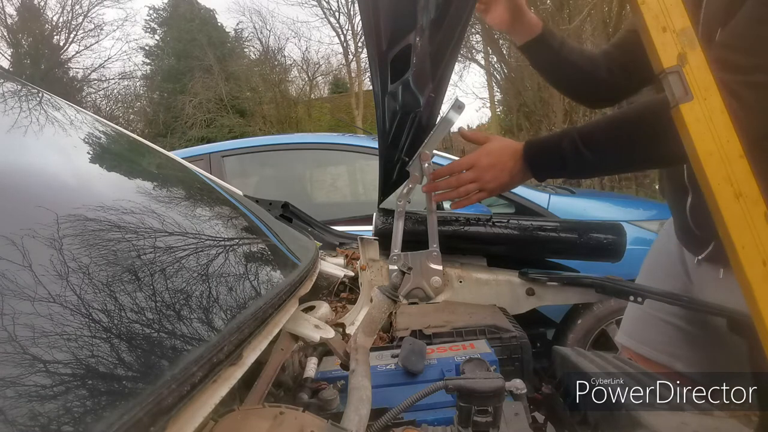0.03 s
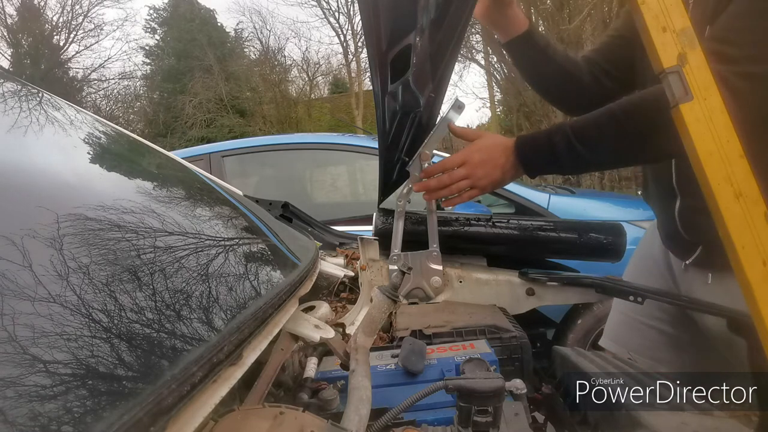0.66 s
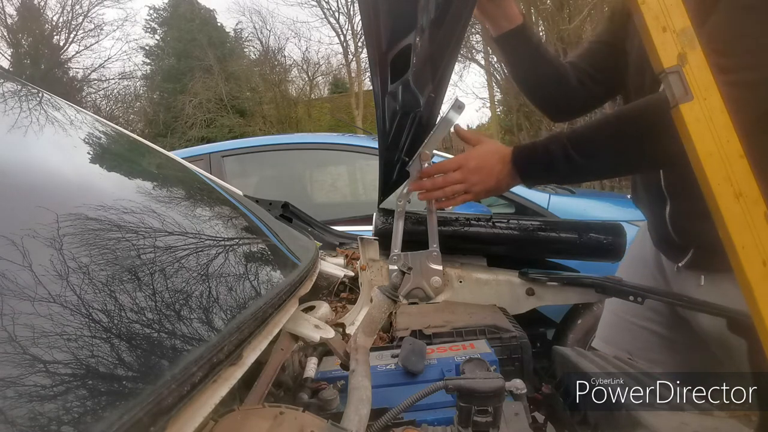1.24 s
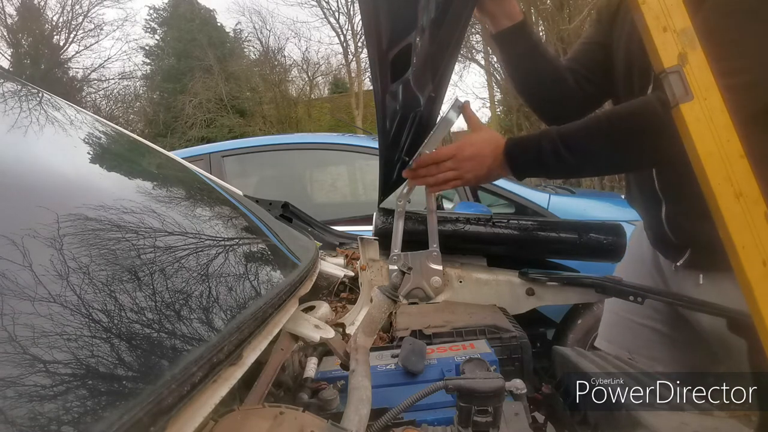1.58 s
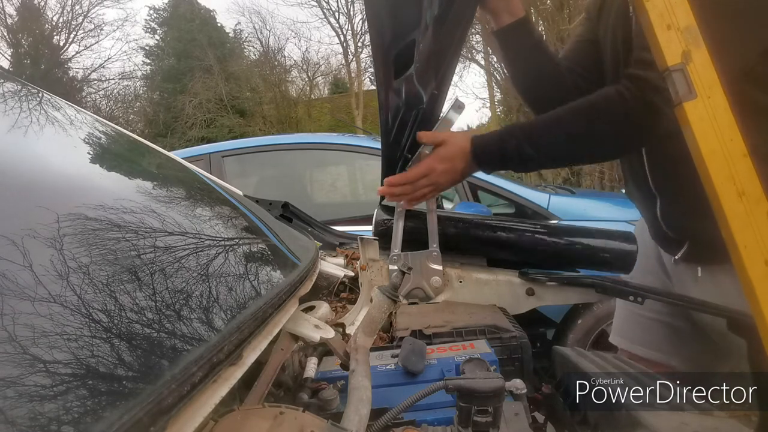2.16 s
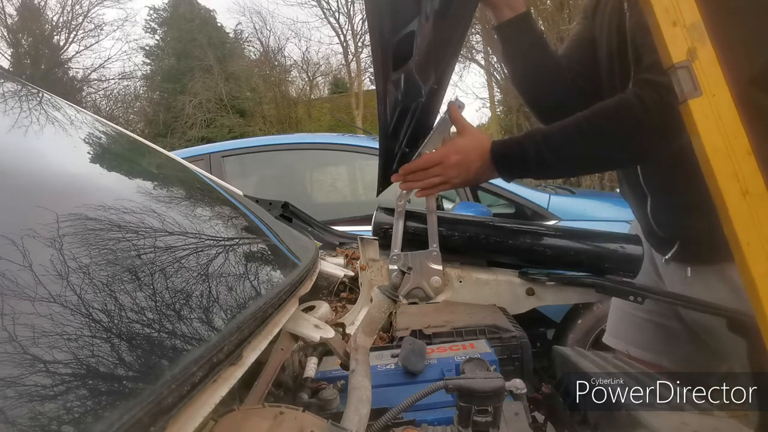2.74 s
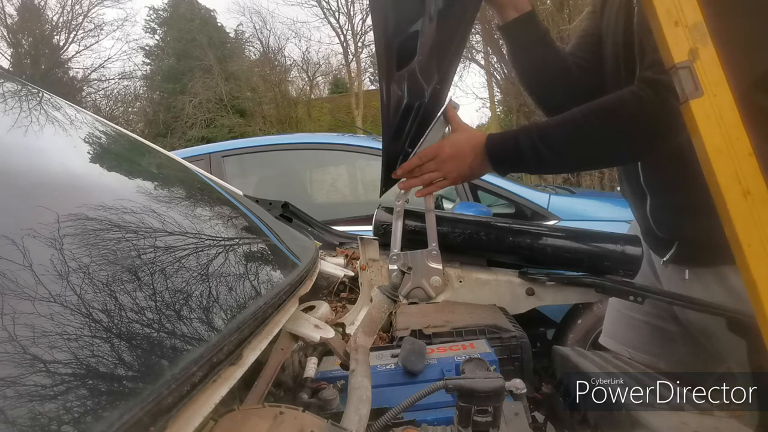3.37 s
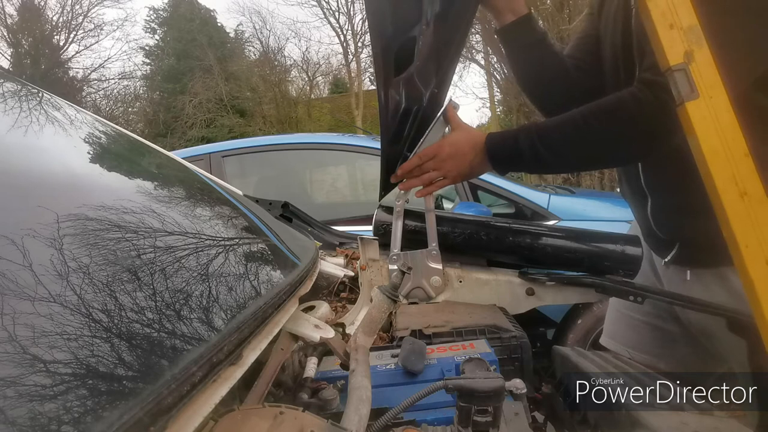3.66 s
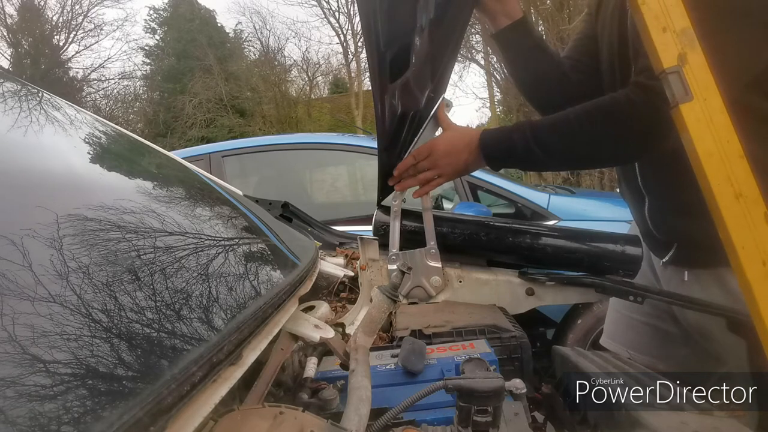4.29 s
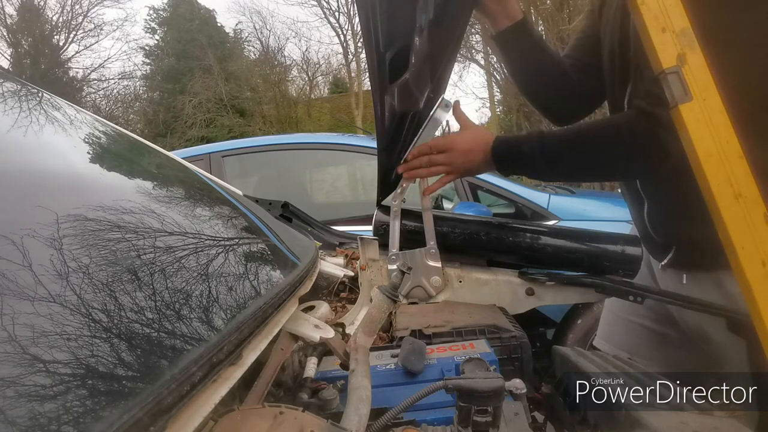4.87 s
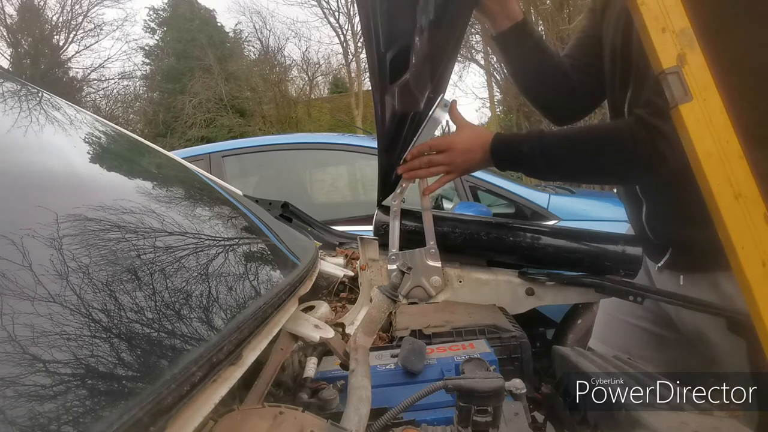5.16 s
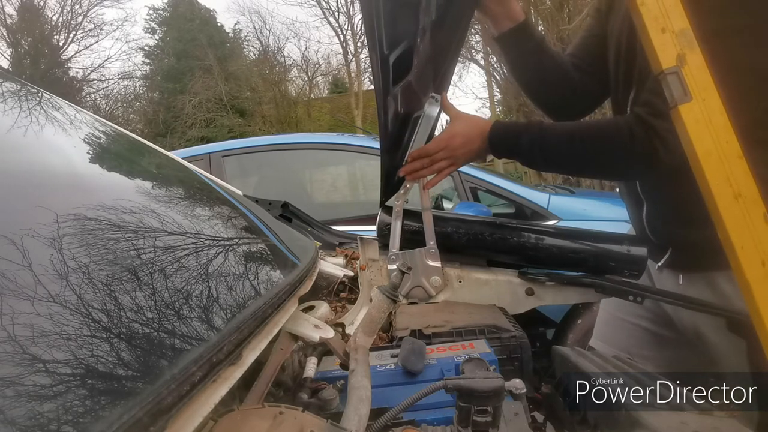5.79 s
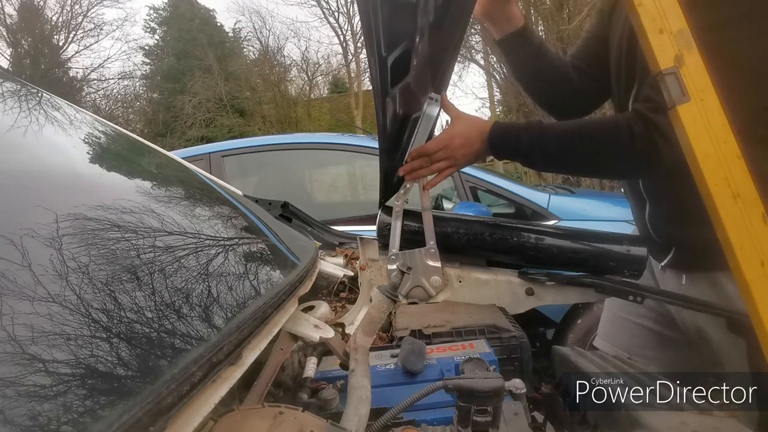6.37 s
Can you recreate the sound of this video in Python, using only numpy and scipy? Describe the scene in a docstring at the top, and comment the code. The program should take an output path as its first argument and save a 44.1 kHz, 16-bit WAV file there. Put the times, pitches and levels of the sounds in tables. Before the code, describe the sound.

Outdoors, a car bonnet is jiggled onto its hinge with close metal clunks, dull panel booms and small bolt scrapes over faint distant traffic.

```python
"""A car draws away, leaving the low wash of a far road, and a sleeve brushes painted steel.
Then, outdoors and close by, a car bonnet is jiggled onto its hinge: the hinge arm clunks and rattles
against its bracket, the big panel bends with dull booms, and a bolt ticks and scrapes in its hole.
Walls and parked cars send back a faint echo of the blows."""
import sys
import numpy as np
from scipy import signal
from scipy.fft import rfft, irfft, next_fast_len
from scipy.io import wavfile
from scipy.ndimage import map_coordinates

SR = 44100
rng = np.random.default_rng(int(sys.argv[2]) if len(sys.argv) > 2 else 0)


def log_audio(samples):
    """Write samples as a 16-bit WAV file to the path given in sys.argv[1]."""
    # one column per channel
    frames = np.atleast_2d(samples).T
    # limit to full scale, then quantise
    limited = np.clip(frames, -1, 1)
    pcm = np.round(limited * 32767).astype(np.int16)
    wavfile.write(sys.argv[1], SR, pcm)


N = 288193
CLOCK = np.arange(N) / SR  # seconds through the scene
T = np.arange(SR // 2) / SR  # seconds through one blow

# Tone colours, saying how strong each pitch is next to the others: pitch_hz, level_db
CAR_TYRES = [(60, 5), (170, -9.5), (280, 0), (520, -9.5), (880, -2.5), (1030, 6.5), (1200, -2.5),
             (2100, -10), (2800, -11.5), (4300, -24), (6000, -23.5), (7300, -35.5), (9000, -55),
             (16000, -66)]  # the nearer car
ROAD_TYRES = [(88, -42.5), (150, -1), (172, -8.5), (213, -1), (328, -6), (422, -3.5), (566, -9),
              (1020, -0.5), (1290, -2.5), (1790, -7.5), (3700, -25.5), (6640, -33), (8400, -49),
              (14500, -57.5), (16000, -70.5)]  # the far road
ROAD_RUMBLE = [(15, -8), (30, -14), (52, 4), (75, -4.5), (110, -1.5), (170, -15.5), (300, -16.5),
               (700, -60.5)]  # the bass under the traffic
CLOTH_HISS = [(1500, -25), (4000, 9), (6500, 9.5), (9000, -5), (13000, -16), (16000, -25)]  # cloth on paint
WEAK_TONES = [(40, -4), (130, -1.5), (700, -5), (1800, -9.5), (2600, -14), (3600, -13.5), (5000, -17),
              (6300, -18), (7500, -24), (9000, -40.5), (13000, -37.5), (16000, -41)]  # the panel's crowd of weaker tones
THREAD_FRICTION = [(1000, -16), (2600, 3.5), (5200, -6.5), (7200, 6), (9000, -25), (16000, 15)]  # the bolt's thread rubbing
MIC_COLOUR = [(7400, -0.5), (8600, -3), (9500, -5), (11500, -2.5), (15000, -9)]  # the microphone's openings
# Stereo width, or how much the two ears differ: pitch_hz, side_db
TRAFFIC_WIDTH = [(60, -25.5), (110, -20.5), (200, -20.5), (380, -18.5), (700, -14.5), (1290, -13),
                 (2380, -6.5), (4400, -2), (8120, 2.5), (15000, -2)]
CLOSE_WIDTH = [(100, -25), (250, -33), (500, -13), (1000, -13.5), (2000, -7), (5000, 4.5), (12000, -3.5)]
# Rubbing strokes: peak_s, level_db, swell_s
SLEEVE_STROKES = [(1.0, -62, 0.029), (1.42, -68, 0.023), (6.08, -68, .015), (6.39, -68, .025)]
BOLT_SCRAPES = [(2.865, -57.5, 0.04), (3.49, -72, 0.013), (3.555, -54, 0.046), (3.885, -61.5, 0.019),
                (4.8, -62, 0.023)]
# The hinge arm hits its bracket. A higher contact_hz is a harder hit; the struck spot favours spot_hz.
# start_s, level_db, contact_hz, spot_hz, into_panel_db
HINGE_CLANKS = [(2.273, -28, 5100, 2310, 7.5), (2.322, -28, 4070, 238, -1), (2.337, -31.5, 8800, 5870, 1),
                (2.355, -40.5, 3200, 940, -14), (2.365, -38.5, 5030, 1790, 5),
                (2.3993, -45.5, 7060, 4570, -5), (2.467, -44, 6000, 2340, -2),
                (2.827, -49.5, 6040, 2500, -8.5), (3.535, -47, 1700, 796, 13),
                (4.205, -32.5, 1460, 1252, -2.5), (5.217, -52.5, 3180, 2780, 5.5),
                (5.5377, -41, 5900, 286, 3), (5.8778, -24.5, 2950, 467, -9)]
# The bonnet is shoved against its stop:
# start_s, level_db, contact_hz, spot_hz, boom_db, sway_back_s, boom_hz
BONNET_SHOVES = [(2.297, -48, 690, 210, -32, .13, 125), (2.831, -61, 1180, 460, -50, .04, 136),
                 (3.471, -42, 1500, 767, -35, 0.051, 142.4), (3.926, -33.5, 1400, 764, -29.5, .15, 116.5),
                 (4.507, -48, 850, 220, -39.5, 0.061, 119), (4.916, -53, 980, 723, -41, 0.087, 122),
                 (5.214, -76, 800, 490, -50, 0.021, 185), (5.4733, -34, 1400, 281, -36, 0.16, 198)]
# The three contacts within one blow: delay_s, change_db, duller_octaves, body_db
CLANK_BOUNCES = [(0, 1, 0.053, -7.5), (.01, -6.5, 0.26, -7), (.05, -12.5, 1.3, -0.5)]  # strikes, rebounds and seats
SHOVE_SETTLES = [(0, 0.5, 0.27, -3), (.018, -9, 0.89, 5), (.052, -13, 1.2, 10.5)]  # lands, then settles twice as the weight follows
# The main tones of bonnet and hinge (each blow shortens their ring): pitch_hz, level_db, base_ring_s
STEEL_TONES = [(85, -15, 1), (127.5, 5.5, 0.28), (142.8, 11.5, 0.34), (182.4, 0, 0.72), (195, 4.5, 0.43),
               (232.4, -7, 1), (266.6, -7.5, 0.47), (327.4, -7.5, 0.69), (396.1, 0, 0.2), (473.2, 2, 0.12),
               (556, -1, 0.11), (615, -15, 0.075), (625.3, 5.5, 0.21), (677.3, 5, 0.22), (755.4, 4, 0.14),
               (873, -10.5, 0.3), (993, -6, 0.037), (1104, 3.5, 0.088), (1090, -33, 0.093),
               (1327, -19, 0.03), (1328, -3.5, 0.27), (1567, 6.5, 0.13), (1750, 7.5, 0.04),
               (2042, -4.5, 0.042), (2403, -12, 0.054), (2770, -0.5, 0.11), (2960, -4.5, 0.2),
               (4200, -21.5, 0.055), (5140, -8, 0.087), (5440, 7.5, 0.039)]
# How long the weaker tones last, before that shortening: pitch_hz, base_ring_s
WEAK_TONE_RING = [(100, 0.39), (400, 0.36), (800, 0.22), (1600, 0.19), (3000, 0.19), (6000, 0.13),
                  (12000, 0.12)]
# Where the metal touches, told by how much sooner the left side hears it: time_s, left_lead_us
CONTACT_SIDE = [(3, -26), (3.4, 40)]
# The bolt knocks in its hole: start_s, level_db, highest_hz
BOLT_TICKS = [(2.337, -25, 9600), (2.813, -55, 9000), (2.8266, -37, 18000), (3.9285, -58, 14000),
              (4.206, -59.5, 9100), (4.478, -52.5, 6900), (5.1415, -46.5, 12900), (5.3737, -46, 12900),
              (5.88, -40, 6480)]
# Pitches at which small parts ring: pitch_hz, width_hz, level_db
BOLT_TONES = [(2550, 62, -1), (2700, 14, 11), (3280, 50, -11), (3500, 160, -3.5), (3670, 120, -32.5),
              (5584, 49, -0.5), (5350, 260, -3.5), (6040, 310, -14), (6600, 44, 4), (6370, 81, -21),
              (6760, 66, -13), (9400, 460, -20), (11900, 210, -13), (12900, 1200, -11), (14700, 900, -14.5)]  # bolt and hinge eye
SQUEAK_TONES = [(2600, 130, -8.5), (3140, 240, -16.5), (3800, 65, -34), (5120, 28, -1), (5860, 270, -12.5),
                (5990, 64, -15), (7060, 57, -19.5)]  # the dragging thread
# How long the echo takes to fall by 60 dB: pitch_hz, ring_s
ECHO_RING = [(100, 0.66), (500, 0.36), (2000, 0.11), (8000, 0.029)]
# How the microphone's two sides differ: pitch_hz, left_minus_right_db
MIC_BALANCE = [(60, -1.5), (110, 0.5), (200, -1.5), (380, -1.5), (700, -1), (1290, -1), (2380, 0.5),
               (4400, -4.5), (8120, -4.5), (15000, 2.5)]


def amp(db):
    """Turn decibels into a number to multiply by."""
    return 10 ** (np.asarray(db) / 20)


def unit(x):
    """Scale a sound to an average (rms) level of 1."""
    return x / np.sqrt(np.mean(x ** 2) + 1e-20)


def along(points, hz):
    """Read between the rows of a (pitch_hz, value) table, on a musical scale."""
    pitches, values = np.transpose(points)
    return np.interp(np.log(hz + 1), np.log(pitches + 1), values)


def fade(t, ring_s):
    """A fade that falls by 60 dB in ring_s."""
    return np.exp(-np.log(1000) * t / ring_s)


def wobble(rate):
    """A smooth curve through `rate` random values a second."""
    return map_coordinates(rng.standard_normal(int(N * rate / SR) + 4), [CLOCK * rate])


def filtered(x, response):
    """Multiply each pitch in a sound by response(hz)."""
    size = next_fast_len(x.shape[-1] + SR // 4)
    hz = np.fft.rfftfreq(size, 1 / SR)
    return irfft(rfft(x, size) * response(hz), size)[..., :x.shape[-1]]


def lowpass(x, hz):
    """Take away the treble, as a soft contact does."""
    return signal.sosfilt(signal.butter(4, min(hz, .45 * SR), fs=SR, output="sos"), x)


def band(x, low_hz, high_hz, order=3):
    """Keep one range of pitches, scaled to level 1 over its first moments."""
    kept = signal.sosfilt(signal.butter(order, [low_hz, high_hz], "bandpass", fs=SR, output="sos"), x)
    return kept / kept[:, :int(SR * (.008 + 4 / low_hz))].std()


def noise(colour, width, size):
    """Stereo noise with a given tone colour, at level 1."""
    mid, side = filtered(rng.standard_normal((2, size)), lambda hz: amp(along(colour, hz)))
    side = filtered(side, lambda hz: amp(along(width, hz)))
    return unit(np.array([mid + side, mid - side]))


def dying(x, ring_times, stretch=1):
    """Let each pitch die away at its own speed."""
    hz, t, slices = signal.stft(x, SR, nperseg=256)
    faded = slices * fade(t, stretch * along(ring_times, hz)[:, None])
    return signal.istft(faded, SR, nperseg=256)[1][:, :len(T)]


def add(track, start_s, sound):
    """Mix one blow into the track."""
    part = track[:, round(start_s * SR):][:, :len(T)]
    part += sound[:, :part.shape[1]]


def traffic(road_fall_db_per_s=0.8744, car_fall_db_per_s=22.5, car_stays_s=.17):
    """One car holds its level, then draws away; the far road's tyre roar and rumble slowly thin."""
    road_db = -47.5 - road_fall_db_per_s * CLOCK
    car_db = -39.5 - car_fall_db_per_s * np.maximum(CLOCK - car_stays_s, 0)
    flutter_db = .5 * wobble(4.1)
    rumble_db = -31 + 0.39 * road_db  # bass fades less with distance
    roar = amp(road_db + flutter_db) * noise(ROAD_TYRES, TRAFFIC_WIDTH, N)
    car = amp(car_db) * noise(CAR_TYRES, TRAFFIC_WIDTH, N)
    rumble = amp(rumble_db + flutter_db) * noise(ROAD_RUMBLE, TRAFFIC_WIDTH, N)
    return roar + car + rumble


def swells(strokes, ease_off=0.7):
    """The loudness of rubbing strokes: each swells to a peak and eases off a little faster."""
    gain = np.zeros(N)
    for peak_s, db, swell_s in strokes:
        width_s = np.where(CLOCK < peak_s, swell_s, ease_off * swell_s)
        gain += amp(db) * np.exp(-((CLOCK - peak_s) / width_s) ** 2 / 2)
    return gain


def sleeve(grain_db=3):
    """Cloth brushes the paint with a faint, grainy hiss."""
    hiss = noise(CLOTH_HISS, CLOSE_WIDTH, N) * amp(grain_db * wobble(250))
    return swells(SLEEVE_STROKES) * unit(hiss)


def ring(spot_hz, stretch, spot_db, spot_width, crowd_db):
    """Struck steel rings with its main tones and a crowd of weak ones, lifted near the spot's pitch."""
    def lift_db(hz):
        return spot_db * np.exp(-(np.log((hz + 1) / spot_hz) / spot_width) ** 2)

    hz, db, base_ring_s = np.transpose(STEEL_TONES)[:, :, None]
    strength = amp(db + lift_db(hz) + 2 * rng.standard_normal(hz.shape))
    phase = rng.uniform(0, 2 * np.pi, hz.shape)
    ear_phase = phase + amp(along(CLOSE_WIDTH, hz)) * rng.standard_normal((2, *hz.shape))
    waves = strength * fade(T, stretch * base_ring_s) * np.exp(2j * np.pi * hz * T)
    tones = (np.exp(1j * ear_phase[..., 0]) @ waves).imag  # add up the waves for each ear
    crowd = filtered(noise(WEAK_TONES, CLOSE_WIDTH, len(T)), lambda f: amp(lift_db(f)))
    crowd = dying(unit(crowd), WEAK_TONE_RING, stretch)
    return tones / tones[:, :SR // 50].std() + amp(crowd_db) * crowd


def strike(db, contact_hz, spot_hz, body_db, dull_db_per_octave):
    """One hit on the steel: the harder it is, the higher the pitches it wakes and the shorter they ring."""
    ranges_hz = [(240, 500), (500, 1000), (1000, 2500), (2500, 16000)]
    centres_hz = np.array([330, 700, 1500, 4500])
    hardness = contact_hz / 2000
    stretch = min(0.78 / hardness ** 0.36, 0.73)  # a hand holds the panel, so the ring stays short
    steel = ring(spot_hz, stretch, spot_db=11, spot_width=0.041, crowd_db=2.5)
    # Ranges above contact_hz are weaker; the range around the struck spot is louder.
    dulled_db = -10 * np.log10(1 + amp(2 * dull_db_per_octave * np.log2(centres_hz / contact_hz)))
    lifted_db = 9.5 * np.exp(-(np.log2(centres_hz / spot_hz) / 0.59) ** 2)
    body, knock, clank, click = [amp(db + range_db) * band(steel, *edges, order=4)
                                 for range_db, edges in zip(dulled_db + lifted_db, ranges_hz)]
    low = amp(body_db) * body + knock
    high = clank + lowpass(click, hz=9400 * hardness ** 0.28)
    low_rise_s, high_rise_s = 0.038, 0.0073  # low bending waves build up more slowly
    return low * (1 - fade(T, low_rise_s)) + high * (1 - fade(T, high_rise_s))


def placed(sound, time_s):
    """A hit reaches one side of the microphone just before the other."""
    lead_s = np.interp(time_s, *np.transpose(CONTACT_SIDE)) * 1e-6
    return filtered(sound, lambda hz: np.exp(1j * np.pi * hz * lead_s * np.array([[1], [-1]])))


def flex(db, spot_hz, swell_s, puff_db=-13):
    """The wide panel gives slowly: its lowest tones swell and boom, and it pushes a puff of air."""
    panel = ring(spot_hz, stretch=0.58, spot_db=8.5, spot_width=0.18, crowd_db=-4.5)
    panel *= 1 - fade(T, swell_s)
    boom = band(panel, low_hz=104, high_hz=188)
    puff = band(panel, low_hz=25.1, high_hz=76.6)
    return amp(db) * (boom + amp(puff_db) * puff)


def hinge(boom_db=-16):
    """Steel on steel: each clank bounces, ever softer and duller, and stirs the panel a little."""
    out = np.zeros((2, N))
    for start_s, db, contact_hz, spot_hz, into_panel_db in HINGE_CLANKS:
        for delay_s, change_db, duller_octaves, body_db in CLANK_BOUNCES:
            blow = strike(db + change_db, contact_hz / 2 ** duller_octaves, spot_hz,
                          body_db + into_panel_db, dull_db_per_octave=34.6)
            add(out, start_s + delay_s, placed(blow, start_s))
        add(out, start_s, flex(db + into_panel_db + boom_db, spot_hz=199, swell_s=0.059))
    return out


def bonnet(boom_lag_s=0.03063, sway_db=-12):
    """Each shove thuds and settles; the panel booms just after, and more softly as it sways back."""
    out = np.zeros((2, N))
    for start_s, db, contact_hz, spot_hz, boom_db, sway_back_s, boom_hz in BONNET_SHOVES:
        weight_db = (boom_db - db) / 2  # the low body lies halfway between knock and boom
        for delay_s, change_db, duller_octaves, body_db in SHOVE_SETTLES:
            thud = strike(db + change_db, contact_hz / 2 ** duller_octaves, spot_hz,
                          body_db + weight_db, dull_db_per_octave=11.2)
            add(out, start_s + delay_s, placed(thud, start_s))
        add(out, start_s, flex(boom_db - 2, spot_hz=184, swell_s=0.035))
        boom_s = start_s + boom_lag_s  # slow bending waves reach the wide panel late
        add(out, boom_s, flex(boom_db, spot_hz=boom_hz, swell_s=0.11))
        add(out, boom_s + sway_back_s, flex(boom_db + sway_db, spot_hz=boom_hz, swell_s=0.15))
    return out


def resonate(force, tones, direct_db):
    """A tap or rub makes a small part ring; a little of the bare contact is heard too."""
    def response(hz):
        return sum((-1) ** k * amp(db) * 1j * hz * width / (pitch ** 2 - hz ** 2 + 1j * hz * width)
                   for k, (pitch, width, db) in enumerate(tones))

    return filtered(force, response) + amp(direct_db) * lowpass(force, hz=7200)


def bolt(scrape_db=1, grain_db=3.8):
    """The bolt knocks with small bright ticks, and its thread drags through the hole with a gritty squeak."""
    ticks = np.zeros((2, N))
    tap_colour = [(400, -4), (1500, 5.5), (16000, -4)]  # pitch_hz, level_db
    for start_s, db, highest_hz in BOLT_TICKS:
        tap = noise(tap_colour, CLOSE_WIDTH, len(T)) * fade(T, ring_s=0.056)
        ringing = resonate(tap, BOLT_TONES, direct_db=-5.5)
        add(ticks, start_s, amp(db) * band(ringing, low_hz=3850, high_hz=highest_hz, order=2))
    friction = noise(THREAD_FRICTION, CLOSE_WIDTH, N) * amp(grain_db * wobble(170))
    squeak = unit(resonate(friction, SQUEAK_TONES, direct_db=-37))
    return ticks + amp(scrape_db) * swells(BOLT_SCRAPES) * squeak


def echo(sound, delay_s=.03):
    """Walls and parked cars scatter the sound back a moment later."""
    colour = [(100, 12.5), (3000, 1), (12000, 4.0)]  # pitch_hz, level_db
    tail = dying(noise(colour, CLOSE_WIDTH, len(T)), ECHO_RING)
    tail /= np.linalg.norm(tail[0])
    late_tail = np.pad(tail, ((0, 0), (int(delay_s * SR), 0)))
    return signal.fftconvolve(sound, late_tail, axes=1)[:, :N]


def scene():
    """Mix the close metal, its faint echo, the sleeve and the traffic."""
    metal = hinge() + bonnet() + bolt()
    return metal + amp(-20) * echo(metal) + sleeve() + traffic()


def record(dry, hiss_db=-92, top_hz=15600):
    """The microphone dulls the treble, mostly on the left, adds faint hiss and cuts the very top."""
    sides = np.array([[.5], [-.5]])
    heard = filtered(dry, lambda hz: amp(along(MIC_COLOUR, hz) + along(MIC_BALANCE, hz) * sides))
    hiss = amp(hiss_db) * rng.standard_normal((2, N))
    return filtered(heard + hiss, lambda hz: hz < top_hz)


dry = scene()
out = record(dry)
log_audio(out)
```